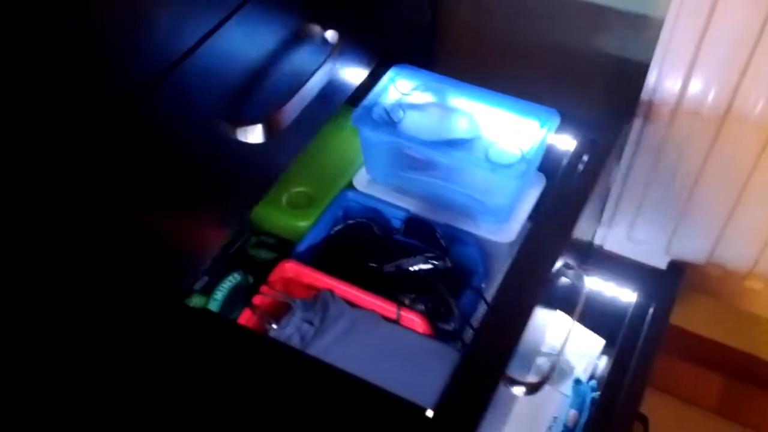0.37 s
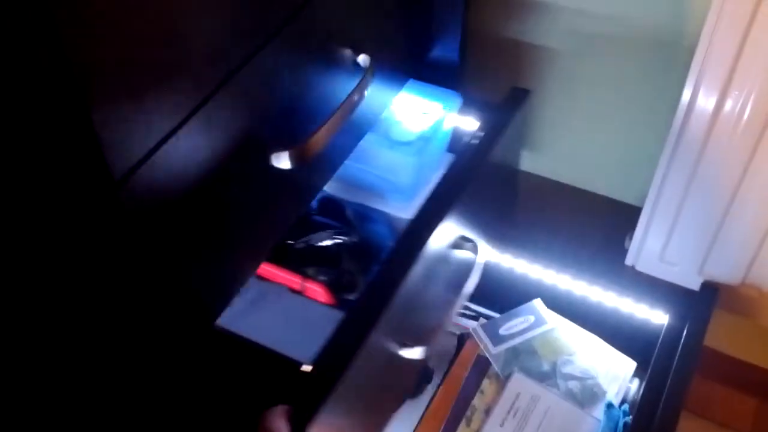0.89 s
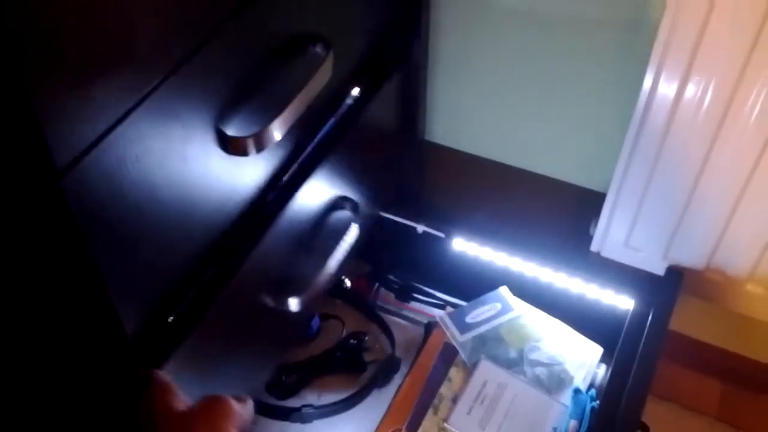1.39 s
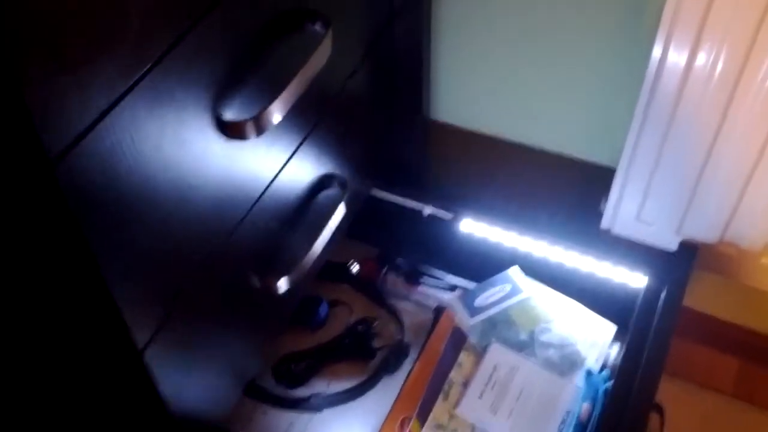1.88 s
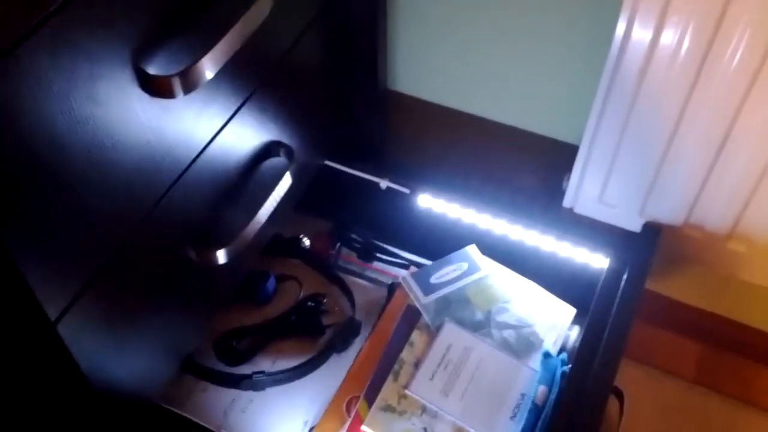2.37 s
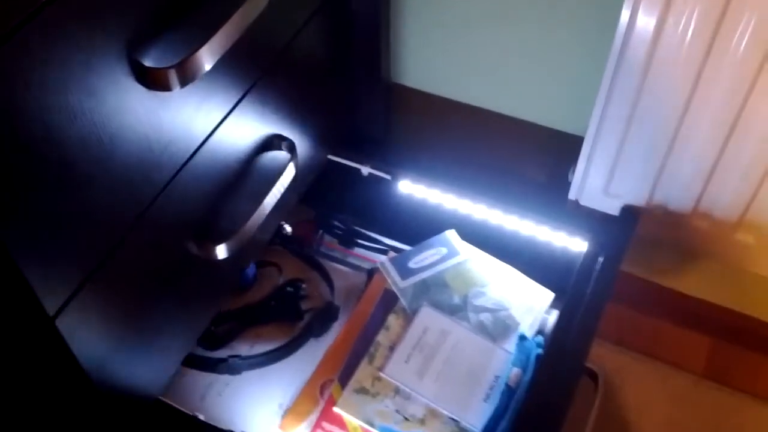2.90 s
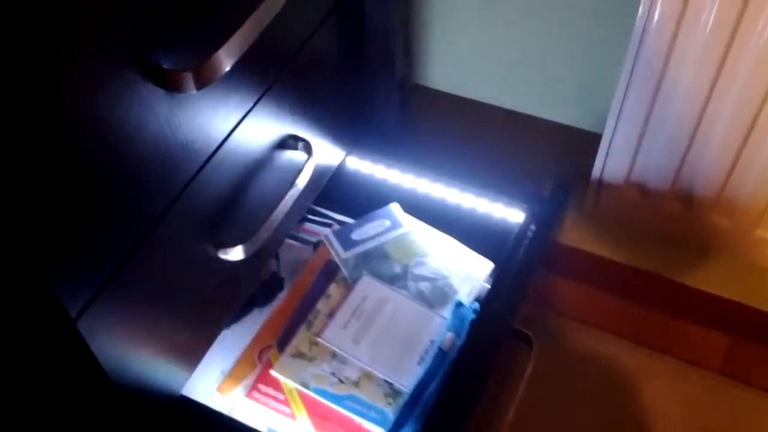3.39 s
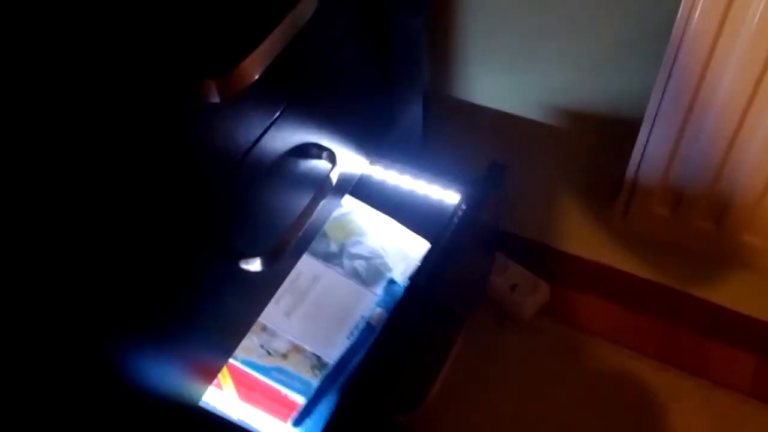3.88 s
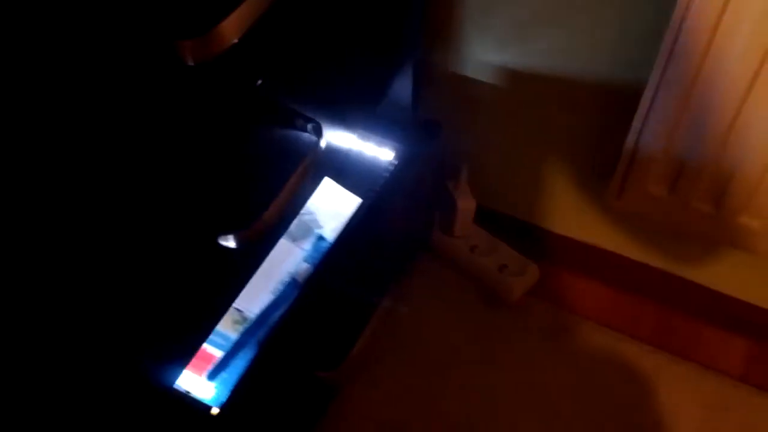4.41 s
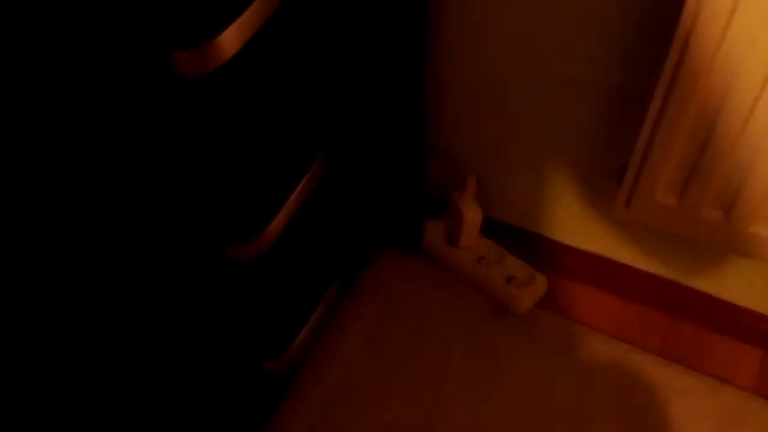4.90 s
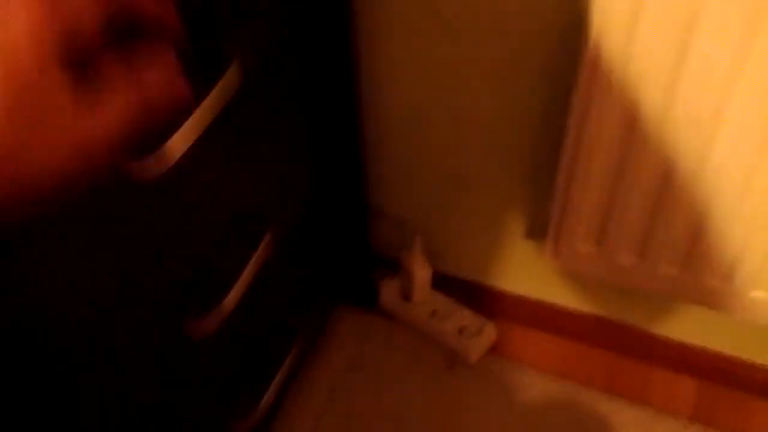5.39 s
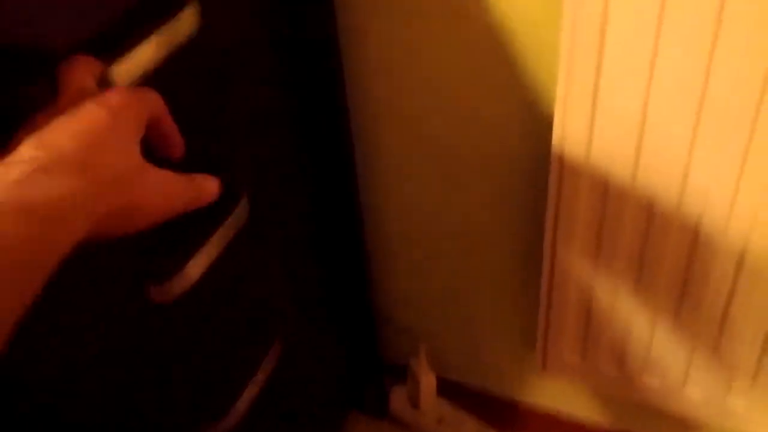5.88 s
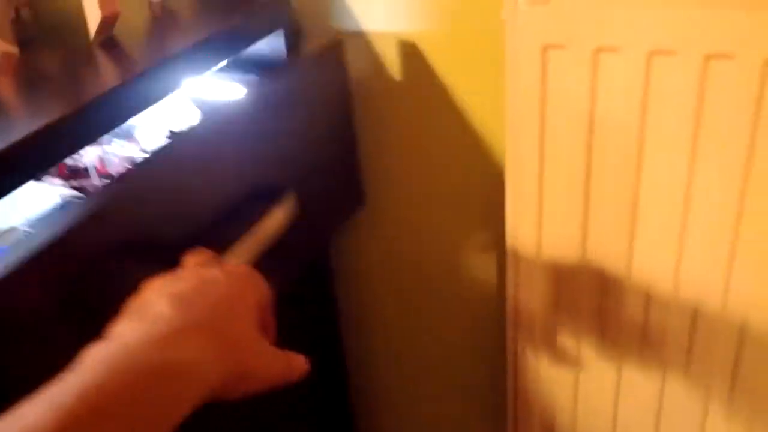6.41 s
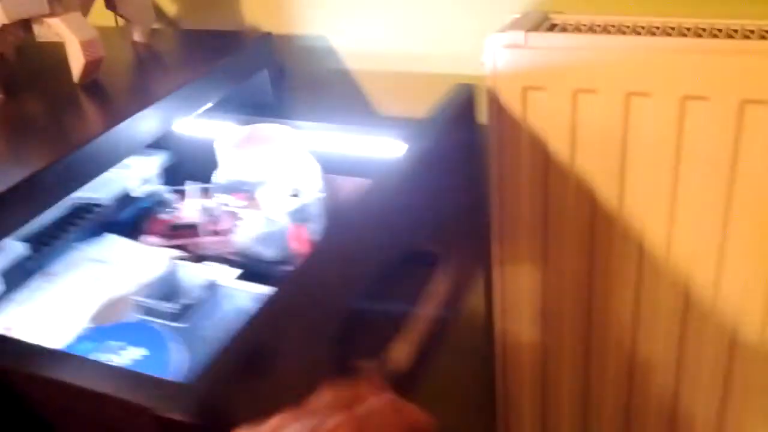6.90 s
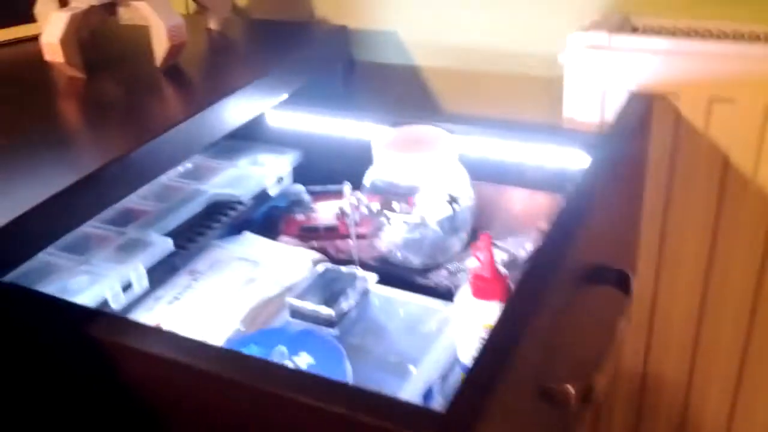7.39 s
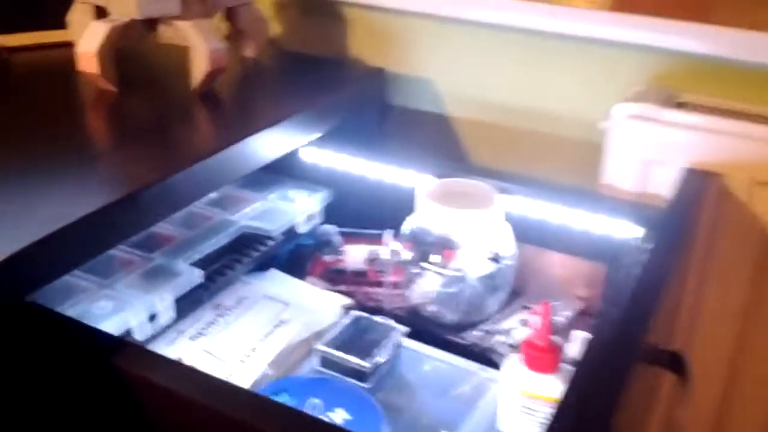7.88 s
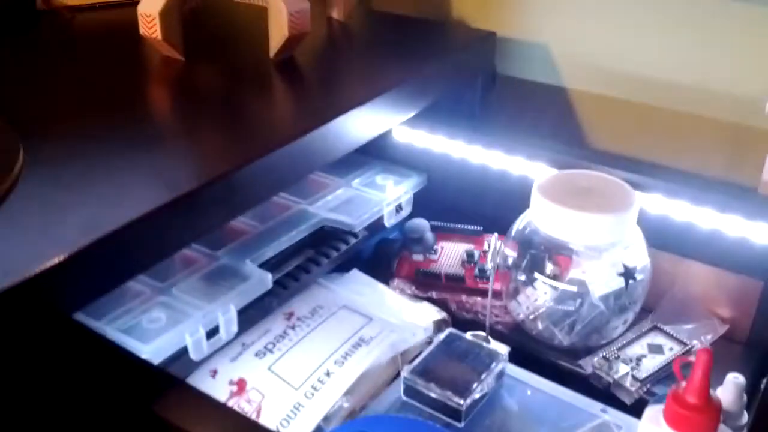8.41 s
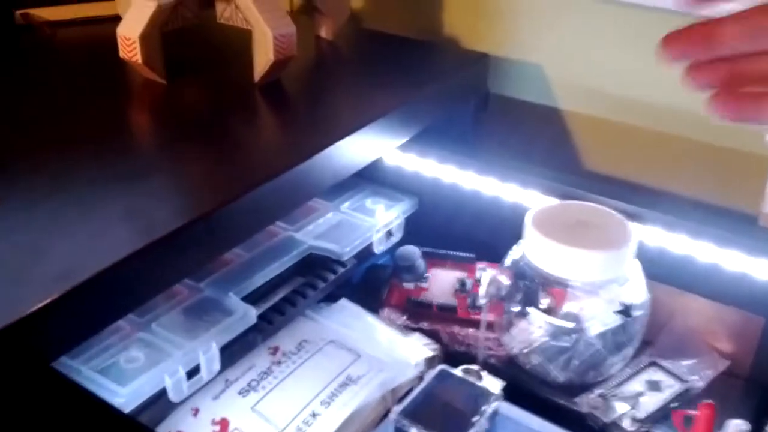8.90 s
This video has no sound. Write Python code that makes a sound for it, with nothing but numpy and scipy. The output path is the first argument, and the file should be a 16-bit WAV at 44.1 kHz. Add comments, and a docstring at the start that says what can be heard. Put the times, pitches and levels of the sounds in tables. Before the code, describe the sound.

Close handheld pickup of desk drawers indoors: deep boxy rolling, runner scrape and small irregular clicks, with dry grip snaps midway. A quieter roll follows, then a short push ending in one loud wooden bang with a brief room tail. Later a drawer is pulled out with rattling ticks. The end is mostly handling noise, a tight cluster of bright snaps and knocks, then quiet room murmur, hiss and tiny regular device ticks.

```python
"""Wooden desk drawers roll in and out: contact grains ring resonances of carcass, panels, box and runners.
Runners and contents tick as decaying noise bursts; one drawer slams, exciting decaying modes and a tail.
Fingers scuff, snap and knock a hand-held camera body, built from shaped noise and damped sines.
The camera's electronics whine as jittered sines and tick at a steady period.
Room murmur and microphone hiss lie beneath as coloured noise."""
import sys
import numpy as np
from scipy import signal
from scipy.io import wavfile
from scipy.ndimage import uniform_filter1d

SR = 44100
rng = np.random.default_rng(int(sys.argv[2]) if len(sys.argv) > 2 else 0)


def field_ratio(decibels):
    """Amplitude ratio for a level in dB (20 dB per decade); scalars and array-likes work."""
    return 10 ** (np.asarray(decibels, dtype=float) / 20)


def generate_wav(sig):
    """Save sig (samples, or channels by samples) to the path in sys.argv[1] as 16-bit PCM at SR."""
    pcm = np.round(np.clip(np.atleast_2d(sig).T, -1, 1) * 32767).astype(np.int16)
    wavfile.write(sys.argv[1], SR, pcm)


N = 398134
TIME = np.arange(N) / SR

# speed of each of the four pushes and pulls, expressed as rumble: (time [s], level [dB])
SPEED = [
    [(0.0, -60), (0.08, -43.5), (0.36, -32.5), (1.02, -33.5), (1.17, -39.5), (1.55, -35.5), (1.79, -54),
     (1.81, -44.5), (2.5, -75)],
    [(2.55, -76), (2.772, -51), (3.07, -40.5), (3.122, -44.5), (3.332, -38), (3.376, -49), (3.406, -39),
     (3.996, -42), (4.12, -52.5)],
    [(4.13, -60), (4.258, -47), (4.28, -55), (4.32, -44.5), (4.37, -45), (4.396, -46.5), (4.576, -49.5),
     (4.848, -42), (4.882, -31.5)],
    [(5.76, -62), (5.836, -41), (5.94, -48.5), (6.266, -34.5), (6.572, -36), (6.962, -38), (7.266, -42),
     (7.52, -60), (7.62, -70)],
]
# spells in which the whine gives way to a tone: (whine stop [s], tone start [s], end [s])
SPELLS = [(.84, .9, 1.41), (7.86, 8.6, 9.03)]


def rms_one(x):
    """Normalise the mean power: unit rms."""
    return x / np.sqrt(np.mean(x ** 2) + 1e-20)


def level_curve(rows):
    """Interpolate a (time [s], level [dB]) table linearly in dB, one value a sample."""
    return np.interp(TIME, *np.transpose(rows))


def at_hz(points, hz, column=1):
    """Interpolate a table over logarithmic frequency."""
    points = np.array(points)
    return np.interp(np.log(hz), np.log(points[:, 0]), points[:, column])


def butterworth(x, order, hz, kind):
    """Filter with a maximally flat passband."""
    return signal.sosfilt(signal.butter(order, hz, kind, fs=SR, output="sos"), x)


def drift(rate):
    """Random modulation: noise through two equal poles at rate [Hz], unit rms, made at every 40th sample."""
    r = np.exp(-80 * np.pi * rate / SR)
    noise = rng.standard_normal(N // 40 + 2002)
    slow = signal.lfilter([1], [1, -2 * r, r * r], noise)[2000:]
    return np.interp(np.arange(N) / 40, np.arange(len(slow)), rms_one(slow))


def resonance(x, hz, width):
    """Simple resonator: a pole pair whose damping sets the bandwidth, with unit gain at the peak."""
    r = np.exp(-np.pi * width / SR)
    poles = [1, -2 * r * np.cos(2 * np.pi * hz / SR), r * r]
    return signal.lfilter([(1 - r * r) / 2, 0, (r * r - 1) / 2], poles, x)


def bands():
    """Band analysis of white noise: yields half-octave (centre [Hz], band noise)."""
    edges = 22 * 2 ** np.arange(0, 9.8, .5)
    white = rng.standard_normal((2, N))  # neighbouring bands use different noise
    for k, (low, high) in enumerate(zip(edges, edges[1:])):
        yield np.sqrt(low * high), butterworth(white[k % 2], 2, [low, high], "band")


def coloured(spectrum, flicker_db):
    """Spectral shaping: noise bands weighted by a spectrum, each level flickering independently."""
    return rms_one(sum(noise * field_ratio(at_hz(spectrum, hz) + flicker_db * drift(36.0)) for hz, noise in bands()))


def grains(per_s, spread_db):
    """Shot-noise model of friction: random contacts of uneven size and sign."""
    sizes = field_ratio(spread_db * np.minimum(rng.exponential(1, N), 4)) * rng.choice([-1, 1], N)
    return sizes * (rng.random(N) < per_s / SR) + 1e-9


def add(out, s, piece):
    """Superpose a piece on the output from time s [s]."""
    at = round(s * SR)
    out[at:at + len(piece)] += piece[:N - at]


def rolled(modes, per_s, spread_db, waver_db, rate, order, pitch=(1,)):
    """Forced modal response: contacts ring resonances of wavering coupling, scaled in pitch by stroke."""
    contacts, out = grains(per_s, spread_db), 0
    starts = [round(rows[0][0] * SR) for rows in SPEED[1:len(pitch)]]
    for hz, width, db in modes:
        rung = np.split(contacts, starts)
        for _ in range(order):
            rung = [resonance(part, hz * scale, width) for part, scale in zip(rung, pitch)]
        coupling = field_ratio(db + waver_db * drift(rate))
        out = out + coupling * rms_one(np.concatenate(rung))
    return rms_one(out)


def stroke_gain(shape):
    """Amplitude envelope over all strokes; shape gives dB from speed, stroke row and progress."""
    # one row a stroke, levels over the speed:
    # (boom [dB], panels [dB], drawer box [dB], scrape at start [dB], scrape at end [dB])
    strokes = [(-3, -4.5, -19.5, -25.5, -28), (-2.5, -6.5, -11, -25, -28), (-3.5, -8, -14, -27, -24.5),
               (-2.5, -3, -10.5, -22, -23.5)]
    out = np.zeros(N)
    for rows, stroke in zip(SPEED, strokes):
        start, end = rows[0][0], rows[-1][0]
        progress = (TIME - start) / (end - start)
        moving = (progress > 0) * (progress < 1)
        out += moving * field_ratio(shape(level_curve(rows), stroke, progress.clip(0, 1)))
    return out


def rolling():
    """Structure-borne sound: roller contacts excite the modes of carcass, panels and drawer box."""
    # modes, the width being that of each of two passes: (frequency [Hz], width [Hz], level [dB])
    boom_modes = [(75.9, 14, 0.5), (110.1, 33.4, 2.5), (145.8, 17.7, -5)]
    panel_modes = [(188, 32.3, 2.5), (216.7, 28, -1), (260, 33, -8.5)]
    drawer_modes = [(297, 46, -4), (358.4, 67, 2.5), (402, 24.4, 0), (454, 40, -3), (561, 45, -7),
                    (677, 88, -9), (735, 49, -13.5), (872, 36, -12.5)]
    # each drawer's load tunes its panels: one frequency factor a stroke
    panel_pitch = [0.93, 0.96, 1.1, 1.01]
    panel_rise, full_speed_db = 0.23, -29.5  # extra dB for each dB of speed, nil at full speed

    def boom_db(speed, stroke, _):
        return speed + stroke[0]

    def panel_db(speed, stroke, _):
        return speed + stroke[1] + panel_rise * (speed - full_speed_db)

    def drawer_db(speed, stroke, _):
        return speed + stroke[2] + panel_rise * (speed - full_speed_db)

    boom = rolled(boom_modes, 300, 3.5, waver_db=1.8, rate=3, order=2)
    panels = rolled(panel_modes, 400, 3.5, waver_db=2.5, rate=3, order=2, pitch=panel_pitch)
    drawer = rolled(drawer_modes, 400, 3.5, waver_db=2.5, rate=3, order=2)
    rumble = stroke_gain(boom_db) * boom + stroke_gain(panel_db) * panels + stroke_gain(drawer_db) * drawer
    return butterworth(rumble, 2, 45., "high")


def scrape_db(speed, stroke, progress):
    """Load transfer: level follows smoothed speed and shifts as the drawer's weight moves along the runners."""
    follows, smooth_s = 0.94, 0.11  # share of the speed's swing in dB; averaging time
    smooth = uniform_filter1d(speed, round(smooth_s * SR))
    followed = smooth.max() + follows * (smooth - smooth.max())
    return followed + stroke[3] + (stroke[4] - stroke[3]) * progress


def scraping():
    """Sliding friction: dense clumped contacts excite runner resonances while the contents knock about."""
    # runner resonances: (frequency [Hz], width [Hz], level [dB])
    runner_modes = [(640, 160, -15), (1030, 570, 10), (1140, 73, -1), (1400, 210, 3), (1800, 150, 3.5),
                    (1950, 330, -17), (2600, 800, -12), (4030, 590, -3)]
    rattle_db = -3.5  # relative to the unclumped scrape
    scrape = rolled(runner_modes, 1500, 4, waver_db=2.5, rate=5, order=1)
    clumps = field_ratio(2 * drift(12))
    knocking = grains(130 * field_ratio(4 * drift(6)), 4)
    rattle = np.zeros(N)
    for hz in np.geomspace(700, 3200, 10):
        rung = resonance(resonance(knocking, hz, .05 * hz), hz, .4 * hz)
        rattle += rms_one(rung) * field_ratio(4 * drift(15))
    return stroke_gain(scrape_db) * (clumps * scrape + field_ratio(rattle_db) * rms_one(rattle))


def floor():
    """Stationary background: room murmur and microphone hiss as shaped noise, the lows a little lumpy."""
    # relative spectral density: (frequency [Hz], level [dB])
    density = [(15, -30), (25, 0.5), (58, -0.5), (145, -23.5), (212, -11), (575, -17.5), (775, -21.5),
               (1790, -24.5), (3720, -30), (9070, -31.5), (12200, -23), (14400, -29), (16000, -32)]
    lumps = drift(2.7)
    out = np.zeros(N)
    for hz, noise in bands():
        out += noise * field_ratio(at_hz(density, hz) + 0.49 * lumps * (hz < 300) + 0.04 * drift(15.0))
    return field_ratio(-57) * rms_one(out)


def since_camera_tick():
    """Periodicity: time [s] since the camera's cycle last began."""
    start_s, period_s = .1926, .6405
    return (TIME - start_s) % period_s


def whine():
    """Frequency modulation: jittered sines that rest after each camera tick and during the spells."""
    # lines: (frequency [Hz], rms jitter [Hz], peak level [dB])
    lines = [(12200, 48, -72), (12050, 31, -70), (13900, 80, -75)]
    rest_s = .05
    on = (since_camera_tick() > rest_s) * 1.
    for stop, _, end in SPELLS:
        on = on * ((TIME < stop) | (TIME > end))
    out = np.zeros(N)
    for hz, jitter, db in lines:
        out += field_ratio(db) * np.sin(2 * np.pi * np.cumsum(hz + jitter * drift(123.0)) / SR)
    return on * out


def camera_ticks():
    """Exponential decay: high-passed noise forms a double tick at each period."""
    since = since_camera_tick()
    second_s = .006
    first = field_ratio(-60 * since / 0.012)
    second = (since > second_s) * field_ratio(-60 * (since - second_s) / 0.016)
    noise = rng.standard_normal(N) * field_ratio(-45.5)  # level ahead of the high-pass
    return butterworth(noise * (first + second), 2, 9000, "high")


def ticks():
    """Impact response: a dying noise burst rings a broad mode and narrow partials, with a bright snap."""
    # runners and drawer contents, plus the slam's bright crack at 4.89 s: (time [s], ring peak [dB], ring
    # frequency [Hz])
    tick_rows = [(0.164, -35.5, 1520), (0.383, -31, 1990), (0.383, -35, 4370), (0.409, -44, 1900),
                 (0.4533, -37, 2040), (0.5602, -30.5, 1110), (0.5601, -36, 846), (0.604, -32.5, 1880),
                 (0.6035, -37, 9000), (1.094, -42, 2370), (1.243, -43, 2600), (1.424, -38.5, 1490),
                 (1.496, -35.5, 3330), (1.513, -38, 2240), (1.526, -35.5, 5530), (1.787, -49, 770),
                 (1.805, -37, 582), (2.3453, -51, 3000), (2.757, -52, 4700), (2.999, -53, 1140),
                 (3.388, -42.5, 1700), (3.49, -38.5, 1920), (3.521, -42, 570), (3.521, -35, 390),
                 (3.768, -41.5, 700), (3.836, -39, 300), (4.319, -52.5, 1490), (4.37, -54, 3900),
                 (4.8595, -37, 2600), (4.8897, -27, 7000), (5.66, -47.5, 476), (5.8148, -51, 1510),
                 (5.8355, -44.5, 1690), (5.898, -37, 3200), (5.9, -32, 5960), (6.0944, -47, 1420),
                 (6.232, -36, 1440), (6.258, -34, 1830), (6.274, -31.5, 1880), (6.32, -44, 1830),
                 (6.4545, -39.5, 4900), (6.4547, -33.5, 2800), (6.6488, -39, 1980), (6.7464, -40, 3100),
                 (6.7466, -42, 5500), (6.794, -38.5, 2170), (6.8437, -37, 1200), (6.929, -41, 1760),
                 (7.006, -33.5, 1870), (7.0576, -41.5, 2160), (8.4533, -45, 1950), (8.611, -41, 354)]
    ring_t60_s, snap_share = 0.056, 0.64  # the snap dies in this share of the ring's time
    snap_db = -19  # snap peak relative to the ring
    out, t = np.zeros(N), TIME[:SR // 5]
    decay = field_ratio(-60 * t / (ring_t60_s * np.array([[1], [snap_share]])))
    for s, db, hz in tick_rows:
        noise = rng.standard_normal((2, len(t))) + 2.9 * (t == t[8])  # noise with one sharp impulse
        burst = noise * decay * np.minimum(t / 0.00011, 1)
        ring = resonance(burst[0], hz, 0.27 * hz) + 0.19 * resonance(burst[0], 0.69 * hz, 1.1 * hz)
        for ratio in np.array([1, 1.2, 1.5, 1.9]) * rng.uniform(.94, 1.06, 4):
            partial = resonance(burst[0], min(ratio * hz, .4 * SR), 0.04 * hz)
            ring = ring + 2.4 * partial / ratio ** 3.5
        ring = butterworth(ring, 2, 7000, "low")
        snap = butterworth(burst[1], 2, [5000, 11000], "band")
        add(out, s, field_ratio(db) * (ring / np.abs(ring).max() + field_ratio(snap_db) * snap / np.abs(snap).max()))
    return out


def room(x):
    """Reverberation: ten feedback delays, each low-passed and attenuated on every round."""
    t60_s, wall_cut_hz = 0.66, 2800
    out, dull = np.zeros(N), np.exp(-2 * np.pi * wall_cut_hz / SR)
    for k, lag in enumerate((np.geomspace(.011, .043, 10) * SR).astype(int)):
        loop, gain, state = x.copy(), field_ratio(-60 * lag / SR / t60_s), [0.]
        for i in range(lag, N, lag):
            back, state = signal.lfilter([gain * (1 - dull)], [1, -dull], loop[i - lag:i], zi=state)
            loop[i:i + lag] += back[:N - i]
        out += (loop - x) * (-1) ** k
    return out


def rings():
    """Friction-excited resonance: decaying narrow-band noise, the narrowest with its own fluctuation removed."""
    # squeaks, rough patches and rings of runners, small things and a fingertip, width per pass:
    # (time [s], frequency [Hz], width [Hz], level [dB], t60 [s])
    ring_rows = [(.48, 1380, 110, -62, 7.8), (0.56, 1438, 100, -29.5, 0.03), (.78, 1870, 90, -55, 0.23),
                 (.86, 1610, 500, -53.5, 0.54), (1.06, 1930, 1200, -57, 1.1), (3.52, 872, 40, -61, 1.6),
                 (4.861, 3870, 1600, -41.5, 0.067), (6.05, 1500, 300, -60.5, 1.3),
                 (6.23, 4670, 2200, -52, 0.35), (6.25, 1880, 350, -51, 0.73), (6.42, 1260, 1100, -51, 2.8),
                 (6.792, 3700, 1500, -55, 0.19), (6.375, 1780, 50, -48, 0.13),
                 (6.794, 2230, 50.8, -57, 0.18), (6.843, 5170, 25, -57, 0.15), (6.85, 1140, 50, -58, .3),
                 (7.006, 1140, 35, -51, 0.18), (7.629, 4500, 600, -51.5, 0.2), (7.711, 4840, 600, -55, 0.1),
                 (8.61, 4030, 280, -47.5, 0.061), (8.62, 3310, 350, -57.5, 0.25)]
    out, t = np.zeros(N), TIME[:SR // 2]
    for s, hz, width, db, t60 in ring_rows:
        noise = rng.standard_normal(2 * len(t))
        tone = rms_one(resonance(resonance(noise, hz, width), hz, width)[len(t):])
        if width < 55:  # keep only the wandering phase
            tone = rms_one(np.cos(np.angle(signal.hilbert(tone))))
        fades = np.minimum(t / 0.00065, 1) * np.minimum((t[-1] - t) / 0.044, 1)
        add(out, s, tone * field_ratio(db - 60 * t / t60) * fades)
    return out


def snaps():
    """Stick-slip release of the grip: short bright noise bursts, each with a thin, slower-dying hiss."""
    # dry snaps: (time [s], nominal peak [dB])
    snap_rows = [(0.605, -36), (1.4312, -23), (1.438, -29), (1.505, -23), (1.5138, -17), (1.526, -23.5),
                 (1.53, -14), (1.827, -23.5), (1.8815, -24), (3.763, -22), (3.7669, -18.5), (3.779, -29),
                 (5.505, -27), (5.8377, -19.5), (6.2597, -24), (7.8426, -14.5), (8.158, -12), (8.188, -16),
                 (8.202, -23), (8.206, -12.5), (8.212, -17), (8.2337, -16), (8.242, -22), (8.2496, -13),
                 (8.264, -17), (8.3005, -31)]
    t60_s, crest_db = 0.009, 9.5  # a burst's nominal peak over its rms
    hiss_db, hiss_t60_s = -19, 0.037  # hiss rms relative to the nominal peak
    snapping, hissing = np.zeros((2, N))
    t = TIME[:SR // 10]
    for s, db in snap_rows:
        add(snapping, s, field_ratio(db - crest_db - 60 * t / t60_s))
        add(hissing, s, field_ratio(db + hiss_db - 60 * t / hiss_t60_s))
    bright = butterworth(snapping * rng.standard_normal(N), 1, 11000., "high")
    return bright + butterworth(hissing * rng.standard_normal(N), 4, 12500., "high")


def rubbing():
    """Friction noise: rubs on the camera body give a bright part and a duller part through the body."""
    # (time [s], length [s], rise [s], treble level [dB], duller part relative to it [dB])
    rub_rows = [(1.426, 0.038, .004, -53, -3), (1.486, 0.13, 0.012, -56, 5.5),
                (2.046, 0.069, .01, -56.5, -53), (2.203, 0.32, .022, -61, -9), (3.752, 0.14, .003, -66, 9),
                (5.5, 0.16, 0.0077, -57, -5), (5.83, 0.26, .008, -63, -21),
                (6.242, 0.17, .004, -61.5, 11.5), (6.73, 0.18, 0.081, -64.5, 8.5),
                (7.894, 0.14, 0.013, -59, -7), (8.016, 0.28, 0.12, -49.5, -1.5),
                (8.281, 0.12, 0.014, -61, 4.5), (8.359, 0.28, 0.047, -51.5, -1.5),
                (8.534, 1, 0.062, -75, 15.5)]
    # relative spectral densities: (frequency [Hz], level [dB])
    bright_density = [(2940, -38), (5000, -1), (9320, -6.5), (10900, -5), (14800, 6.5), (16000, -5)]
    dull_density = [(150, 3.5), (300, 6), (700, -1), (1700, -1), (3500, -6), (6000, -15)]
    hold, start_db, end_db = 0.44, -11, -21  # hold as share of the length
    bright, dull = np.zeros(N), np.zeros(N)
    for s, length, rise, db, dull_db in rub_rows:
        share = (TIME - s) / length
        risen = rise / length
        shape_db = np.interp(share, [0, risen, risen + hold, 1], [start_db, 0, 0, end_db])
        stroke = field_ratio(db + shape_db) * (share > 0) * (share < 1)
        bright += stroke
        dull += field_ratio(dull_db) * stroke
    out = bright * coloured(bright_density, flicker_db=1.5) + dull * coloured(dull_density, flicker_db=2.5)
    return out * field_ratio(.7 * drift(60.0))


def spell_tones():
    """Frequency glide: a jittered tone scoops up to pitch, with its octave locked in phase."""
    pitch_hz, jitter_hz, scoop_hz, scoop_s = 7240, 44, 220, 0.02
    tone_db, octave_db = -74, 8  # the octave relative to the tone
    out = np.zeros(N)
    for _, start, end in SPELLS:
        hz = pitch_hz - scoop_hz * np.exp(-np.maximum(TIME - start, 0) / scoop_s)
        phase = 2 * np.pi * np.cumsum(hz + jitter_hz * drift(79.0)) / SR
        tone = np.sin(phase) + field_ratio(octave_db) * np.sin(2 * phase)
        out += (TIME > start) * (TIME < end) * field_ratio(tone_db) * tone
    return out


def bumps():
    """Damped oscillation: a soft push through hand and carcass rings for a fixed number of cycles."""
    # dull bumps: (time [s], starting level [dB], frequency [Hz])
    bump_rows = [(1.529, -32.5, 73.6), (1.83, -32, 76), (3.398, -33, 113), (3.415, -39, 38.0),
                 (3.843, -41, 105), (5.831, -33, 188), (6.262, -30, 114), (7.349, -42, 35.0)]
    decay_cycles = 15.0  # cycles to fall 60 dB
    out, t = np.zeros(N), TIME[:SR // 3]
    for s, db, hz in bump_rows:
        add(out, s, field_ratio(db - 60 * t * hz / decay_cycles) * np.sin(2 * np.pi * hz * t))
    return out


def knocks():
    """Heavy damping: finger knocks on the camera body die in a few cycles plus the contact time."""
    # dry knocks: (time [s], starting level [dB], frequency [Hz])
    knock_rows = [(1.864, -50, 4500), (1.8715, -42, 4250), (1.878, -43, 3300), (1.8815, -38, 4300),
                  (1.9, -45, 2200), (8.157, -30, 206), (8.158, -27.5, 3530), (8.159, -27, 650),
                  (8.2154, -32, 320), (8.2347, -29, 386), (8.2357, -29, 2100), (8.2337, -30.5, 1200),
                  (8.241, -47, 1600), (8.2493, -31, 1620)]
    decay_cycles, contact_s = 2.6, 0.0035
    out, t = np.zeros(N), TIME[:SR // 3]
    for s, db, hz in knock_rows:
        add(out, s, field_ratio(db - 60 * t / (decay_cycles / hz + contact_s)) * np.sin(2 * np.pi * hz * t))
    return out


def slam():
    """Impact excitation: hard cracks, soft thuds into modes, and a tail decaying band by band."""
    # cracks, then the front seating home; thud levels precede the modal weights:
    # (time [s], crack peak [dB], crack frequency [Hz], thud level [dB], thud contact frequency [Hz])
    contacts = [(4.881, -32, 9000, -21, 250), (4.8881, -13.5, 2360, -16.5, 1500),
                (4.889, -16.5, 775, -55, 120), (4.896, -21, 14000, -49, 500),
                (4.911, -27.5, 1460, -17, 198), (4.948, -50, 1500, -41, 220)]
    # modes of carcass and drawer front: (frequency [Hz], level [dB], t60 [s])
    front_modes = [(81, 2, 0.21), (109.4, -2, 0.83), (139.6, -4.5, 0.32), (189.7, 2, 0.76),
                   (216, 0.5, 0.57), (262, -7, 0.29), (349, -8, 0.2), (403.7, -10.5, 0.36),
                   (658, -14, 0.55), (703, -12, 0.2), (746, -10, 0.24), (1206, -13, 0.19),
                   (1545, -14, 0.29), (1950, -8, 0.046), (2790, -2, 0.044), (3700, -18, 0.031),
                   (5500, -20, .04)]
    # tail: (frequency [Hz], band level [dB], t60 [s])
    tail = [(35, -39, 0.49), (68, -31, 0.66), (176, -32, 0.84), (500, -36, 0.64), (1200, -41, 0.56),
            (3000, -47, 0.55), (7000, -51, 0.31), (14000, -44, 0.22)]
    out, t = np.zeros(N), TIME[:SR]
    for s, crack_db, crack_hz, thud_db, contact_hz in contacts:
        chatter = rng.standard_normal(len(t)) * np.minimum(t / 0.0012, 1)
        noise = (chatter + 3.4 * (t == 0)) * field_ratio(-60 * t / 0.026)  # first contact, then chatter
        crack = resonance(noise, crack_hz, 1.05 * crack_hz)
        crack = resonance(crack, crack_hz, 0.71 * crack_hz) + 0.0057 * noise
        add(out, s, field_ratio(crack_db) * crack / np.abs(crack).max())
        for k, (hz, db, t60) in enumerate(front_modes):
            ratio = hz / contact_hz
            soft = ratio / (1 + ratio ** 2)  # favours modes near the contact frequency
            strength = field_ratio(thud_db + db + rng.normal(0, 0.71)) * soft * (-1) ** k
            add(out, s, strength * field_ratio(-60 * t / t60) * np.sin(2 * np.pi * hz * t))
    since = np.maximum(TIME - contacts[1][0], 0)
    for hz, noise in bands():
        swell = 1 - np.exp(-since * hz / 1.4)  # lows build up later
        decay_db = -60 * since / at_hz(tail, hz, column=2)
        out += rms_one(noise) * swell * field_ratio(at_hz(tail, hz) + decay_db)
    return out


def slips():
    """Friction through a cavity: fingertip slips excite the resonances of the hollow camera body."""
    # slips: (time [s], level [dB], length [s])
    slip_rows = [(7.575, -55, 0.062), (7.626, -46, 0.057), (7.669, -48, 0.04), (7.707, -45, 0.055),
                 (7.753, -56, 0.049), (7.817, -51, 0.1), (7.942, -56, 0.1)]
    # body resonances, each of two passes 1.8 times this wide: (frequency [Hz], width [Hz], level [dB])
    body_modes = [(4500, 1700, 1), (7340, 830, 6), (10800, 2200, -1), (13400, 4500, 10)]
    friction = grains(per_s=6900.0, spread_db=-1.5)
    hollow, slipping = np.zeros((2, N))
    for hz, width, db in body_modes:
        rung = resonance(resonance(friction, hz, 1.8 * width), hz, 1.8 * width)
        hollow += field_ratio(db) * rms_one(rung)
    for s, db, length in slip_rows:
        t = TIME[:round(length * SR)]
        fades = np.minimum(t / 0.0066, 1) * np.minimum((length - t) / 0.026, 1)
        add(slipping, s, field_ratio(db - 2.0 * t / length) * fades)
    return slipping * rms_one(hollow)


def hand_wobble():
    """Low-frequency vibration: band-passed noise stands for the wobble of the holding hand."""
    # (time [s], level [dB])
    wobble_rows = [(7.9, -79), (8.2, -50), (8.6, -78)]
    wobble = rms_one(butterworth(rng.standard_normal(N), 2, [22., 75.], "band"))
    return wobble * field_ratio(level_curve(wobble_rows)) * (TIME > wobble_rows[0][0])


def scene():
    """Linear superposition: desk sounds, reverberation of ticks and rings, then sounds at the camera."""
    hits = ticks() + rings()
    desk = rolling() + scraping() + hits + field_ratio(-18.5) * room(hits) + bumps() + slam()
    fingers = snaps() + rubbing() + knocks() + slips() + hand_wobble()
    electronics = whine() + camera_ticks() + spell_tones()
    return (desk + fingers + electronics + floor())[None]


def top_cut(x):
    """Nothing passes above the cut-off."""
    return signal.sosfilt(signal.butter(12, 16970, fs=SR, output="sos"), x)


def record(dry):
    """Band limitation: a steep Chebyshev low-pass is 50 dB down from 16.1 kHz."""
    mix = signal.sosfilt(signal.cheby2(14, 50, 16100, fs=SR, output="sos"), dry)
    return top_cut(mix)


dry = scene()
out = record(dry)
generate_wav(out)
```